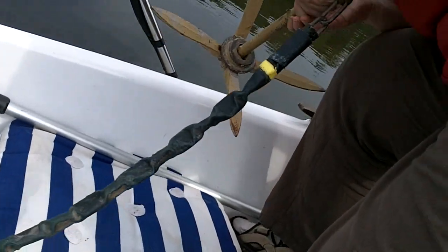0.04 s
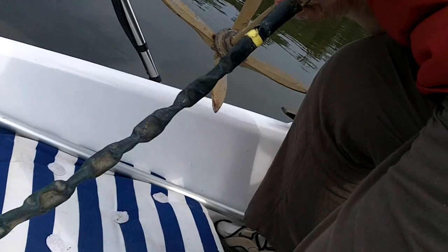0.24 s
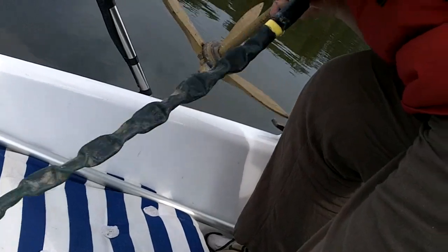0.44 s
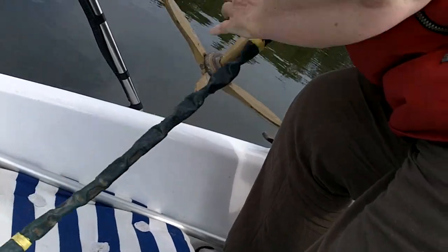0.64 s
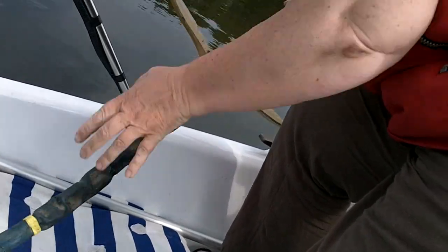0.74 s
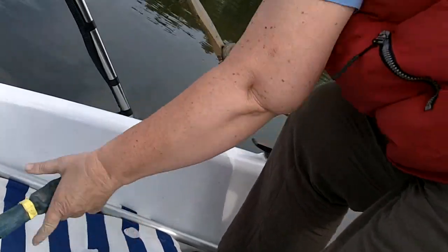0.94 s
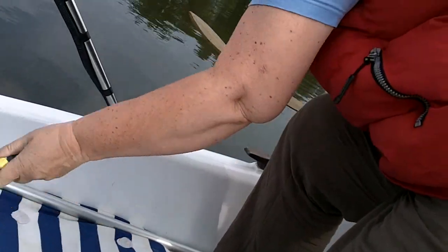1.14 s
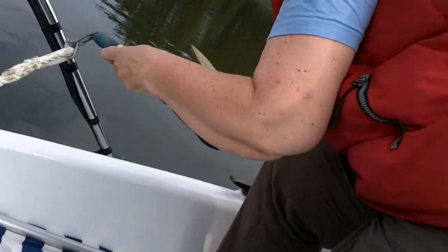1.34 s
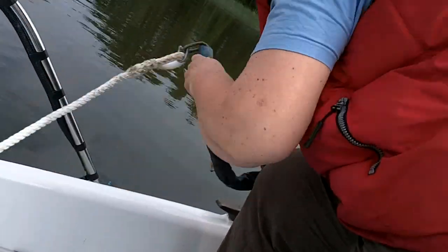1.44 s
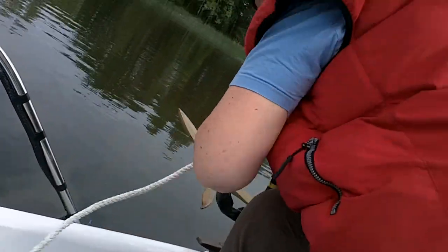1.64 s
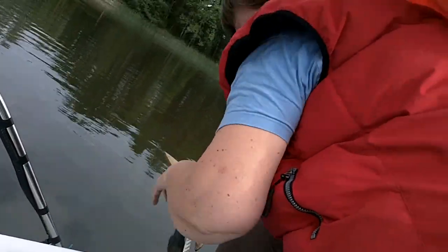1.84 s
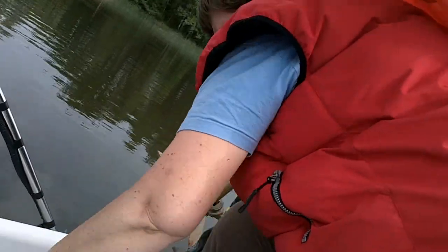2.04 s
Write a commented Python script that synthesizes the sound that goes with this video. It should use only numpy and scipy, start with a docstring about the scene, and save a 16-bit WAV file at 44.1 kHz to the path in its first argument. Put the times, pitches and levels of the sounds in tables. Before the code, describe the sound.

A muffled chain is hauled aboard a small boat, one sharp clack, light rattles, later hollow thumps

```python
"""Sleeved anchor chain over a plastic hull

Aboard a small boat, a sleeved chain is hauled hand over hand along the hull and let over the edge.
Links clink dully as damped resonances struck by noise and a crack; snaps are single filtered pulses.
Knocks and booms are decaying sines, the dragging is random slips through hull resonances, and the rope
groans as wavering tones. Cloth and far leaves hiss and water thuds low, both as shaped noise.
One small housed microphone hears it all, with deep notches and no treble above its band limit."""
import sys
import numpy as np
from scipy import signal
from scipy.fft import rfft, irfft, next_fast_len
from scipy.io import wavfile
from scipy.ndimage import uniform_filter1d, map_coordinates

SR = 44100
rng = np.random.default_rng(int(sys.argv[2]) if len(sys.argv) > 2 else 0)


def level_to_linear(level):
    """Convert decibel levels to linear amplitude factors, elementwise."""
    exponent = np.asarray(level, float) / 20
    return 10 ** exponent


def digitize_waveform(pressure):
    """Quantize a signal to 16-bit integers and store it at the path in sys.argv[1].

    Rows of a 2-D input are taken as channels; values are limited to [-1, 1].
    """
    field = np.atleast_2d(pressure).T
    bounded = np.clip(field, -1, 1)
    quanta = np.round(bounded * 32767).astype(np.int16)
    wavfile.write(sys.argv[1], SR, quanta)


N = 92610  # samples, 2.1 s


def unit(x):
    """Scales a sound to rms 1."""
    return x / np.sqrt(np.mean(x ** 2) + 1e-20)


def curve(rows, axis=1):
    """Draws one column of (seconds, value, ..) rows as a value per sample."""
    columns = np.transpose(rows)
    return np.interp(np.arange(N) / SR, columns[0], columns[axis])


def wobble(rate):
    """Draws a smooth random curve with rate knots a second."""
    knots = rng.standard_normal(N // 20)
    return map_coordinates(knots, [np.arange(N) * rate / SR])


def filtered(x, response):
    """Multiplies the spectrum of x by a complex response of frequency."""
    m = next_fast_len(len(x) + 8192)
    hz = np.fft.rfftfreq(m, 1 / SR)
    return irfft(rfft(x, m) * response(hz), m)[:len(x)]


def coloured(x, points):
    """Shapes x through (Hz, dB) points on a log frequency axis, to rms 1."""
    point_hz, point_db = np.transpose(points)
    return unit(filtered(x, lambda f: level_to_linear(np.interp(np.log(f + 1), np.log(point_hz), point_db))))


def body(modes):
    """Sums (Hz, width Hz, dB) resonances of alternating sign into one response."""
    def response(f):
        return sum((-1) ** k * level_to_linear(db) * 1j * f * width / (hz * hz - f * f + 1j * f * width)
                   for k, (hz, width, db) in enumerate(modes))
    return response


def even(x, span_s):
    """Divides out slow chance swells, to rms 1."""
    power = abs(uniform_filter1d(x ** 2, round(span_s * SR)))
    return unit(x / np.sqrt(power + 1e-3))


def add(track, s, sound):
    """Mixes a sound into the track at time s."""
    part = track[round(s * SR):][:len(sound)]
    part += sound[:len(part)]


# Resonances of one damped link. Each row: centre in Hz, width in Hz, gain in dB before the clink's own balance.
LINK_MODES = [(1230, 62, -10), (1330, 41, -18), (1530, 390, 10.5), (1960, 110, 16.5), (2260, 60, 10.5),
              (2630, 72, 11.5), (3410, 410, 5.5), (3860, 190, 10.5), (4150, 520, 7), (4450, 450, 7.5),
              (4890, 164, 6), (6520, 2400, -17.5), (10260, 1100, -23.5)]
# Links clinking. Each row: contact in seconds, nominal level in dB, gain of the lower modes in dB,
# gain of the treble modes in dB, time for the rattle to fall 60 dB in seconds.
CLINKS = [(0.11, -38.5, -1, -20, 0.041), (.183, -49, 3, 0, 0.025), (0.2112, -8.5, -2, 0.5, 0.029),
          (0.2351, -27, 13, -1, .025), (0.251, -33.5, 3, -3, 0.021), (0.343, -24, 1.5, -2, 0.036),
          (0.36, -29, -15, -6, 0.011), (0.369, -26.5, 0, 7, 0.039), (0.3762, -25, 6, 12.5, 0.019),
          (0.3846, -21.5, 11, -6, 0.012), (.399, -38, -18, -9, 0.017), (0.4211, -28.5, -1.5, -4, 0.0087),
          (0.446, -36, 1, -3, .03), (0.506, -27.5, -10.5, 3, 0.027), (0.584, -47, 15, -4, 0.026),
          (.611, -37, -16, -2, .02), (0.624, -28.5, -8, 8, 0.015), (0.6631, -25, -17, -5, 0.023),
          (0.751, -43, -30, 6.5, 0.077), (0.956, -36, -8.5, 6, 0.1), (1.151, -33, -23, 0, 0.014),
          (1.362, -41.5, 3.5, 16, .02), (1.3795, -32, -27, 12.5, 0.0079), (1.878, -44, -9, -2, .03),
          (1.928, -38, -9.5, 3, 0.096), (2.098, -51, -10, -7, .03)]
LOWER_BELOW_HZ, TREBLE_FROM_HZ = 2700, 5500
LINK_LOW_HZ = 900  # the ring thins out below this
SLIDE_S, CRACK_DB, SPIKY_DB = 0.0019, 12, 0.5  # slide into contact, crack, grain of the rattle
AFTER_DB, AFTER_T60_S = -9, 0.09  # jingle after each contact


def clinks():
    """Links slide into contact, crack and rattle briefly; all of it rings the damped link."""
    out = np.zeros(N)
    t = np.arange(-SR // 100, SR // 6) / SR
    for s, db, lower_db, treble_db, t60 in CLINKS:
        grit = unit(rng.standard_normal(len(t)) * level_to_linear(SPIKY_DB * rng.standard_normal(len(t))))
        rattle = level_to_linear(-60 * t / t60) + level_to_linear(AFTER_DB - 60 * t / AFTER_T60_S)
        shape = np.where(t < 0, np.exp(t / SLIDE_S), rattle)
        crack = level_to_linear(CRACK_DB) * (t == 0)
        link = body([(hz, width, g + lower_db * (hz < LOWER_BELOW_HZ) + treble_db * (hz > TREBLE_FROM_HZ))
                     for hz, width, g in LINK_MODES])
        ring = unit(filtered(grit * shape + crack,
                             lambda f: link(f) * (1j * f / (LINK_LOW_HZ + 1j * f)) ** 2))
        add(out, s + t[0], level_to_linear(db) * ring * np.sqrt(np.mean(shape ** 2)) / 2)
    return out


# Dry snaps without ring. Each row: start in seconds, peak in dB, centre in Hz, width in Hz.
SNAPS = [(.2122, -5, 4150, 900), (0.2122, -15.5, 1960, 500), (.3296, -34, 696, 1200),
         (.3862, -18, 1370, 1210), (0.42, -35, 2480, 3460), (.585, -33, 1280, 1200),
         (.6648, -29.5, 5050, 2200), (1.062, -32.5, 780, 1000), (1.1506, -25.5, 1710, 3370),
         (1.681, -37, 703, 800), (1.852, -43, 700, 900)]


def snaps():
    """Each snap is a single pulse through one wide resonance, applied twice."""
    out = np.zeros(N)
    pulse = signal.unit_impulse(SR // 50)
    for s, db, hz, width in SNAPS:
        click = filtered(pulse, lambda f: (1j * f * width / (hz * hz - f * f + 1j * f * width)) ** 2)
        add(out, s, level_to_linear(db) * click / abs(click).max())
    return out


# Resonances of the hull panels. Each row: centre in Hz, width in Hz, gain in dB.
HULL_MODES = [(136, 103, -14), (214, 55, -1), (342, 36, 1), (420.4, 42, 0.5), (547, 38, -2),
              (697, 81, -4.5), (941, 80, -8), (1152, 63, -10), (1840, 660, -34)]


def hull_panels(x):
    """Sounds x through the hull panels, to rms 1."""
    return unit(filtered(x, body(HULL_MODES)))


# Tones of one knock. Each row: multiple of the pitch, gain in dB, give or take a random 1 dB.
KNOCK_RING = [(0.999, 3), (1.9, -12.5)]
# Chain knocking on the hull. Each row: start in seconds, level in dB before the ring gains, pitch in Hz,
# time to fall 60 dB at the pitch in seconds, level of the scuff on the hull in dB.
KNOCKS = [(.124, -31.5, 323, 0.078, -36.5), (0.207, -46, 420, 0.043, -31), (0.243, -42, 503, 0.068, -37),
          (.328, -31, 207, 0.14, -35.5), (0.383, -36, 356, 0.082, -44), (1.679, -50, 284, 0.04, -35.5),
          (1.767, -37.5, 694, 0.086, -34), (1.789, -27, 190, 0.019, -39.5),
          (1.851, -34.5, 668, 0.058, -36.5), (1.894, -31.5, 142, 0.079, -44), (1.909, -36, 608, 0.054, -38),
          (1.929, -35.5, 146, 0.15, -47.5), (1.973, -38.5, 280, 0.096, -38), (2.009, -30, 166, 0.039, -42),
          (2.084, -48, 603, 0.15, -67)]


def knocks():
    """Soft blows make a fast-dying ring and a scuff of noise through the hull panels."""
    out = np.zeros(N)
    t = np.arange(SR // 4) / SR
    for s, db, hz, t60, scuff_db in KNOCKS:
        ring = sum(level_to_linear(g + rng.normal(0, 1) - 60 * t * k ** .5 / t60) * np.sin(2 * np.pi * k * hz * t)
                   for k, g in KNOCK_RING)
        onset = 1 - np.exp(-t / .001)
        fade = level_to_linear(-60 * t / t60)
        scuff = hull_panels(rng.standard_normal(len(t)) * fade) * np.sqrt(np.mean(fade ** 2))
        add(out, s, -level_to_linear(db) * ring * onset + level_to_linear(scuff_db) * scuff)
    return out


# Hull booms. Each row: start in seconds, level in dB before doubling, pitch in Hz, time to fall 60 dB in seconds.
BOOMS = [(0.386, -27, 93, 0.071), (1.457, -20, 54, 0.08), (1.542, -24, 55.7, 0.1), (1.627, -26, 61, 0.094),
         (1.795, -20.5, 58.86, 0.081)]
BOOM_RISE_S = 0.011


def booms():
    """The hull booms as low sines that rise softly and die away."""
    out = np.zeros(N)
    t = np.arange(SR // 4) / SR
    for s, db, hz, t60 in BOOMS:
        onset = 1 - np.exp(-t / BOOM_RISE_S)
        add(out, s, -level_to_linear(db - 60 * t / t60) * 2 * onset * np.sin(2 * np.pi * hz * t))
    return out


# Chain dragging on the hull. Each row: time in seconds, level in dB, further gain of the upper panel modes in dB.
DRAG = [(0, -44, 18.5), (.03, -48.5, 8.5), (.1, -54, 16), (.16, -57.5, 6), (.3, -56.5, -18),
        (.34, -42.5, 11), (.46, -56, 10.5), (.64, -55.5, 5), (1.02, -67.5, 22.5), (1.2, -64.5, 12),
        (1.35, -65.5, 10), (1.41, -48, 12), (1.46, -34, 2), (1.52, -35.5, 3.5), (1.58, -35.5, 4.5),
        (1.645, -37, -3.5), (1.7, -54.5, -12), (1.75, -57, 8.5), (1.84, -60, -4), (1.88, -41, -26),
        (1.95, -47.5, -11), (2.03, -49.5, -28), (2.1, -70.5, -16)]
SLIPS_PER_S, SLIP_SPREAD_DB = 2500, 1
UPPER_FROM_HZ = 800


def drag():
    """Uneven slips of the sleeve excite the hull panels."""
    happens = rng.random(N) < SLIPS_PER_S / SR
    slips = happens * rng.standard_normal(N) * level_to_linear(SLIP_SPREAD_DB * wobble(60))
    sound = even(hull_panels(slips), span_s=0.046)
    upper = filtered(sound, lambda f: 1 / (1 + (UPPER_FROM_HZ / (f + 1)) ** 6))
    lower = sound - upper
    return level_to_linear(curve(DRAG)) * (lower + level_to_linear(curve(DRAG, axis=2)) * upper)


# Overtones of the groan. Each row: multiple of the slip rate, gain in dB before wobble.
GROAN_OVERTONES = [(2, 3.5), (3, 0.5)]
# The taut rope over the edge. Each row: time in seconds, slips per second before jitter, level in dB,
# further gain of the overtones in dB.
GROAN = [(1.44, 215, -70, 2), (1.47, 213.4, -50, 7), (1.49, 209.5, -43, 4.5), (1.51, 212.4, -33, -4),
         (1.535, 235.8, -33, -18), (1.56, 248.4, -41, -1), (1.59, 236.9, -36, -1), (1.64, 217.5, -38, -7.5),
         (1.67, 235, -51, 2), (1.7, 234, -88, -5)]
GROAN_JITTER = 0.013  # share of the slip rate


def groan():
    """The taut rope groans in regular slips: a wavering tone at the slip rate and two overtones."""
    slip_hz = curve(GROAN) * (1 + GROAN_JITTER * wobble(90))
    phase = 2 * np.pi * np.cumsum(slip_hz) / SR
    started = np.arange(N) / SR >= GROAN[0][0]
    level_db = np.where(started, curve(GROAN, axis=2), -120)
    overtones = sum(level_to_linear(db + 2 * wobble(20)) * np.sin(k * phase) for k, db in GROAN_OVERTONES)
    return level_to_linear(level_db) * (np.sin(phase) + level_to_linear(curve(GROAN, axis=3)) * overtones)


# A small steel part. The one row: start in seconds, level in dB before roughening, pitch in Hz,
# time to fall 60 dB in seconds.
TINK = (1.931, -46, 8950, .09)


def tink():
    """A small steel part gives one thin high ring, roughened by a fast random wobble."""
    s, db, hz, t60 = TINK
    t = np.maximum(np.arange(N) / SR - s, 0)
    return level_to_linear(db - 60 * t / t60) * wobble(540) * np.sin(2 * np.pi * hz * t)


# Cloth and far leaves. Each row: time in seconds, level in dB before the lift and wobble.
RUSTLE = [(0, -54), (.15, -55.5), (.3, -58.5), (.48, -52.5), (.6, -54.5), (.7, -56), (.76, -51.5),
          (.84, -54), (.95, -49.5), (1.05, -47.5), (1.16, -50), (1.25, -54), (1.33, -55.5), (1.42, -55),
          (1.56, -51), (1.7, -56), (1.9, -56), (2.1, -55)]
# Their colour. Each row: frequency in Hz, relative level in dB.
RUSTLE_COLOUR = [(150, -6), (400, -2.5), (900, -4), (2000, -3.5), (3300, -3), (4900, 1), (5700, -11),
                 (7200, -20), (8500, -24), (10500, -21), (11500, -59)]
RUSTLE_LIFT_DB, PATCHY_DB = 3.5, 2


def rustle():
    """Cloth and far leaves hiss as noise made patchy in time and frequency."""
    spectrum = signal.stft(rng.standard_normal(N + 512), nperseg=256)[2]
    patches = uniform_filter1d(rng.standard_normal(spectrum.shape), 5, 0)  # over frequency
    patches = unit(uniform_filter1d(patches, 8, 1))  # over time
    hiss = signal.istft(spectrum * level_to_linear(PATCHY_DB * patches), nperseg=256)[1][:N]
    level_db = curve(RUSTLE) + RUSTLE_LIFT_DB + 0.5 * wobble(30.57)
    return level_to_linear(level_db) * coloured(hiss, RUSTLE_COLOUR)


# Water thudding under the hull. Each row: time in seconds, level in dB before wobble.
RUMBLE = [(0, -48), (.06, -44.5), (.2, -47), (.3, -47.5), (.45, -47), (.6, -48.5), (.75, -49), (.9, -46.5),
          (1.02, -52.5), (1.15, -49), (1.25, -50), (1.31, -51.5), (1.4, -43.5), (1.57, -41), (1.7, -46),
          (1.77, -44), (1.85, -42), (1.96, -51.5), (2.1, -47)]
# Its colour. Each row: frequency in Hz, relative level in dB.
RUMBLE_COLOUR = [(15, -37), (30, -17), (55, -3.5), (85, -4.5), (120, -8.5), (170, -18), (300, -26.5),
                 (600, -75)]


def rumble():
    """Water laps low under the boat as fairly even deep noise."""
    level_db = curve(RUMBLE) + 1.54 * wobble(11.9)
    lapping = even(coloured(rng.standard_normal(N), RUMBLE_COLOUR), span_s=0.09)
    return level_to_linear(level_db) * lapping


def scene():
    """Sums all sources into one channel."""
    handling = clinks() + snaps() + knocks() + booms() + drag() + groan() + tink()
    background = rustle() + rumble()
    return (handling + background)[None]


def roll_off(x):
    """The treble ends steeply here."""
    return signal.sosfilt(signal.butter(12, 11330, fs=SR, output="sos"), x)


# Notches of the microphone housing, each acting twice. Each row: centre in Hz, width in Hz, depth of one pass in dB.
NOTCHES = [(2700, 330, -20), (5490, 300, -20), (7870, 800, -22), (10920, 400, -25)]
TOP_HZ = 11080  # band limit


def record(dry):
    """The microphone housing cuts notches, and nothing passes above the band limit."""
    def housing(f):
        cuts = [(hz * hz - f * f + 1j * f * width * level_to_linear(db)) / (hz * hz - f * f + 1j * f * width)
                for hz, width, db in NOTCHES]
        return np.prod(cuts, axis=0) ** 2 * (f < TOP_HZ)
    mix = filtered(dry[0], housing)[None]
    return roll_off(mix)


dry = scene()
out = record(dry)
digitize_waveform(out)
```